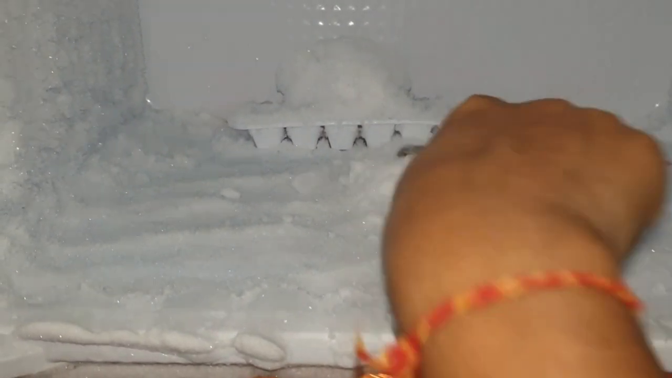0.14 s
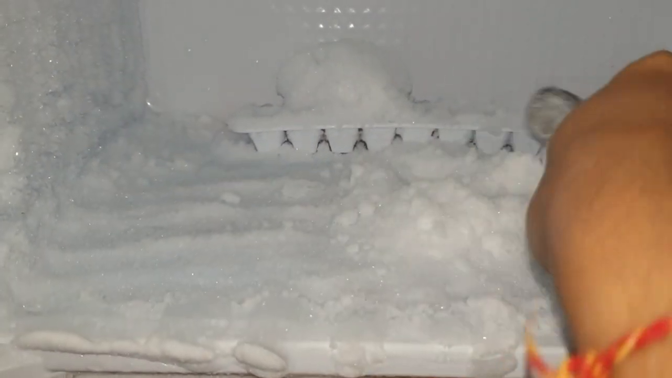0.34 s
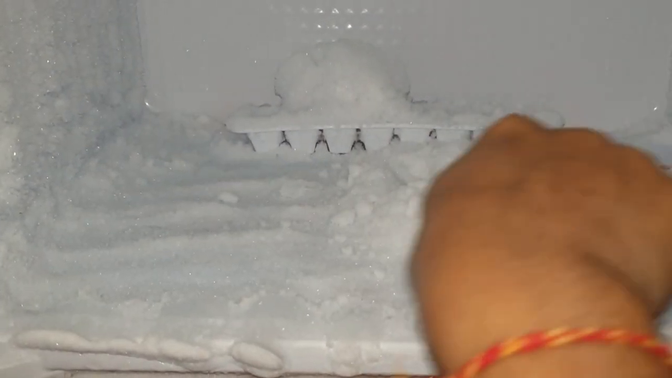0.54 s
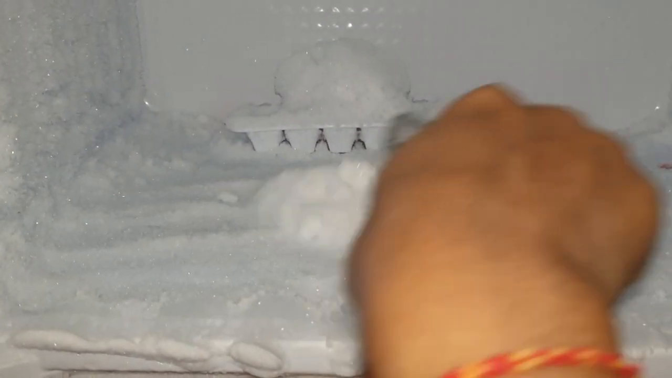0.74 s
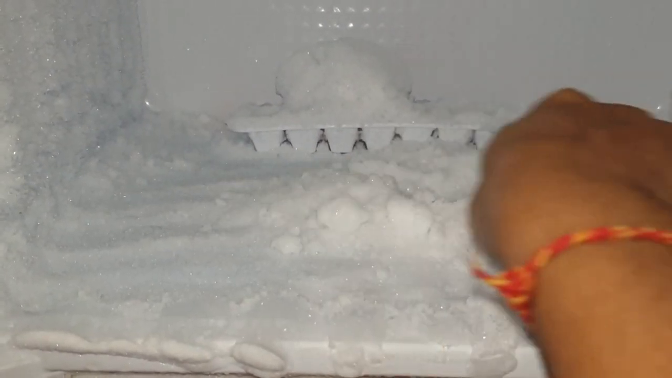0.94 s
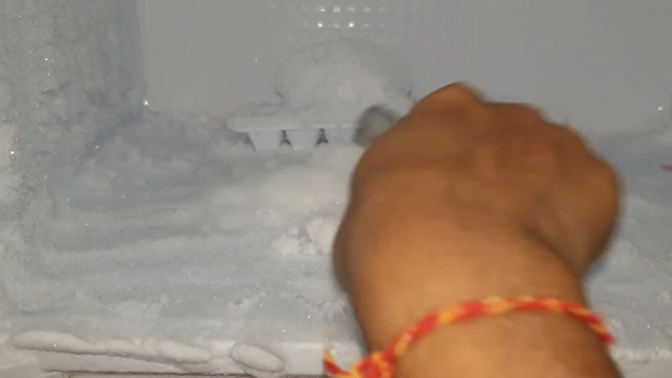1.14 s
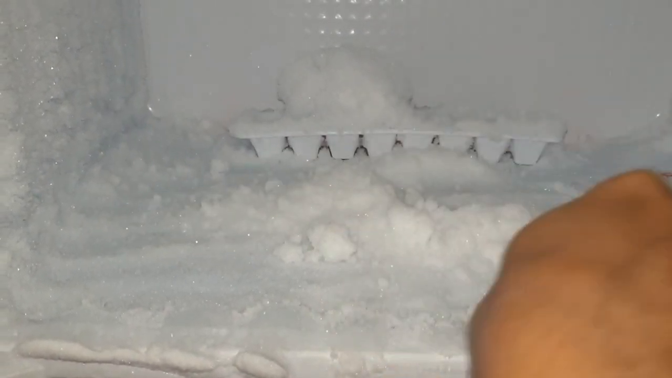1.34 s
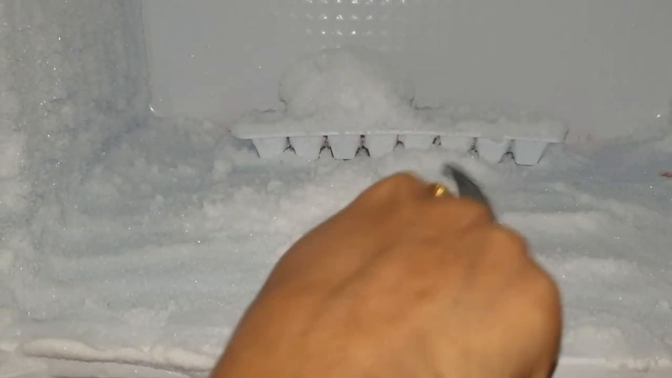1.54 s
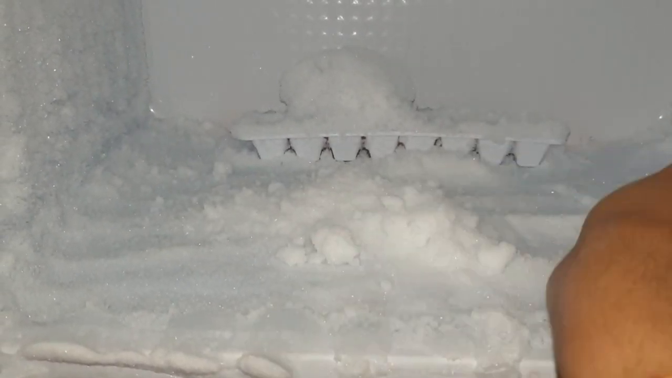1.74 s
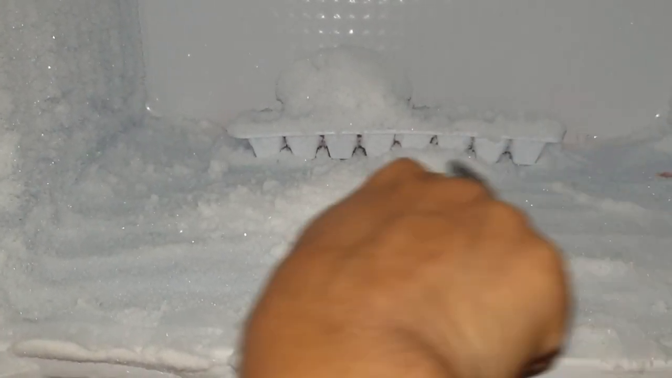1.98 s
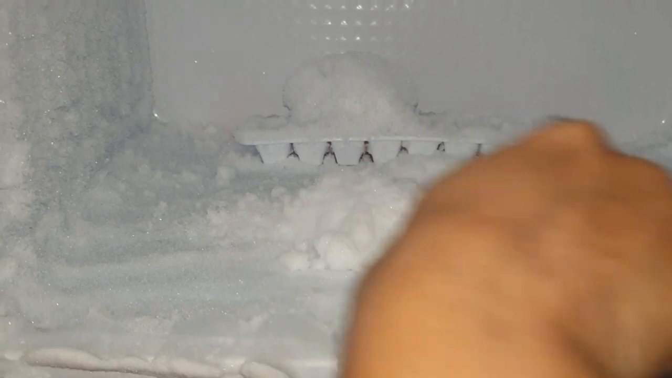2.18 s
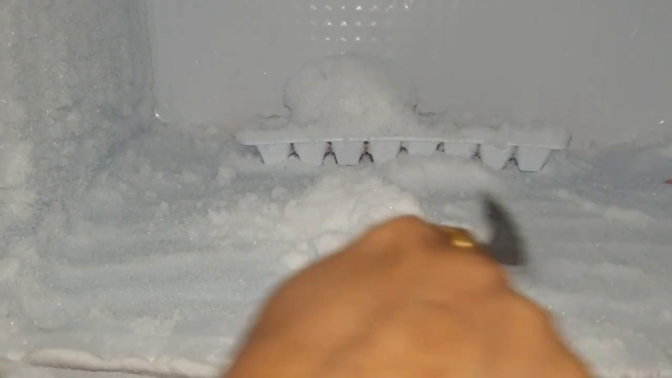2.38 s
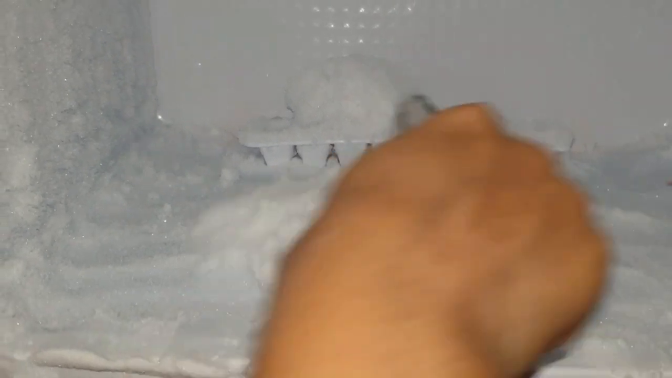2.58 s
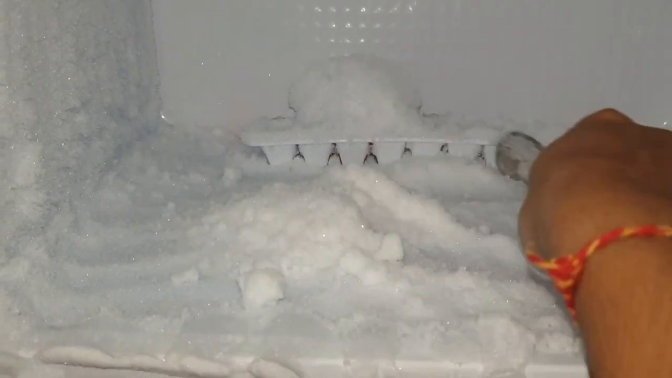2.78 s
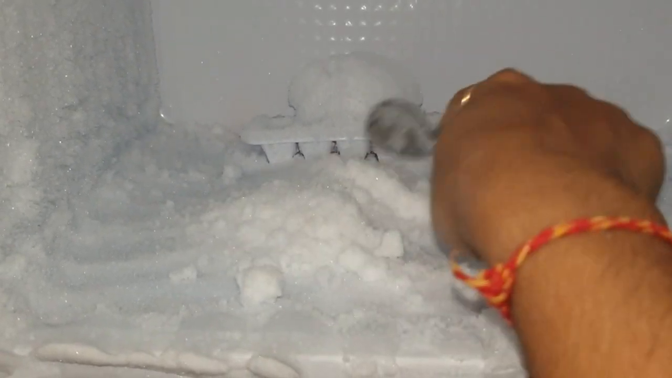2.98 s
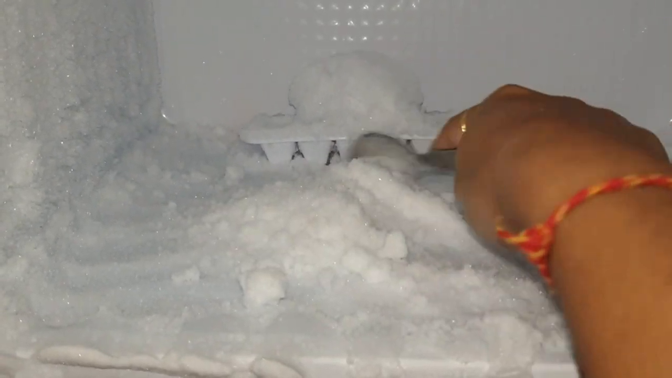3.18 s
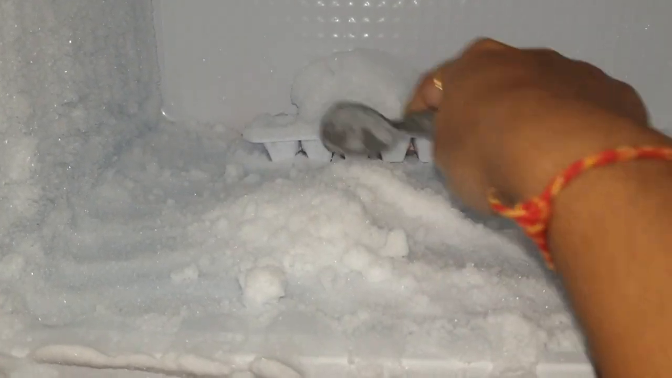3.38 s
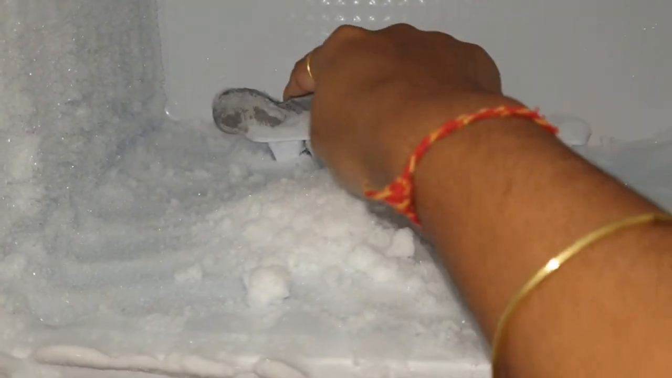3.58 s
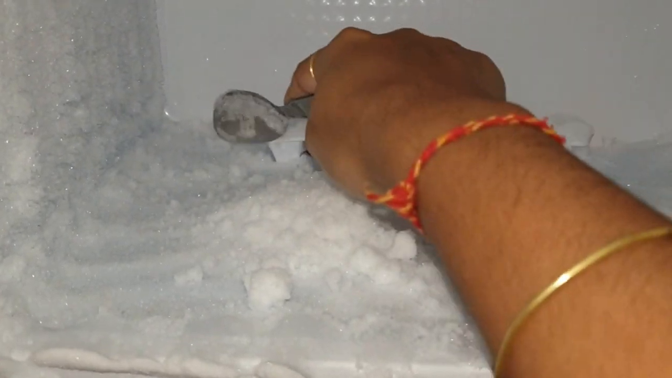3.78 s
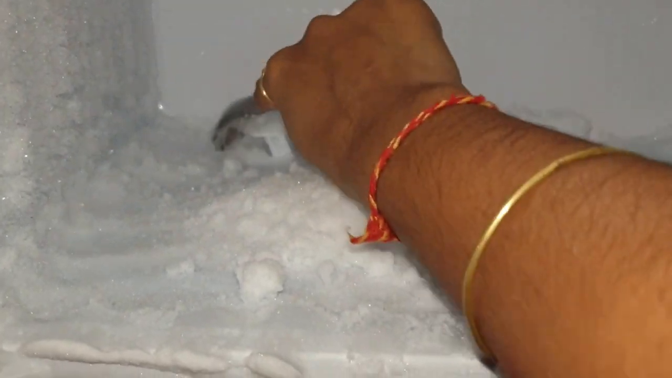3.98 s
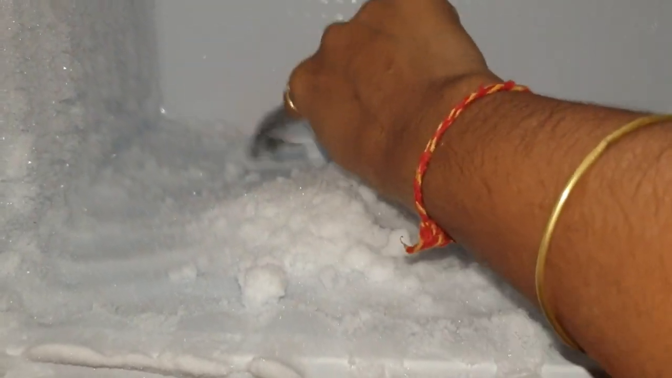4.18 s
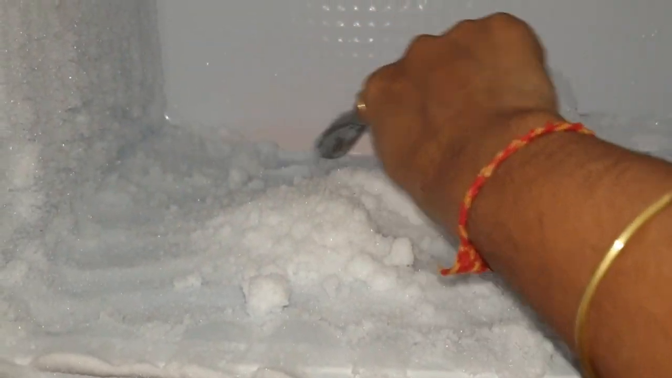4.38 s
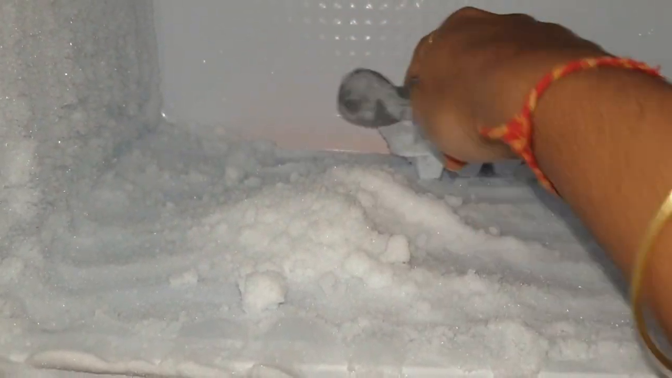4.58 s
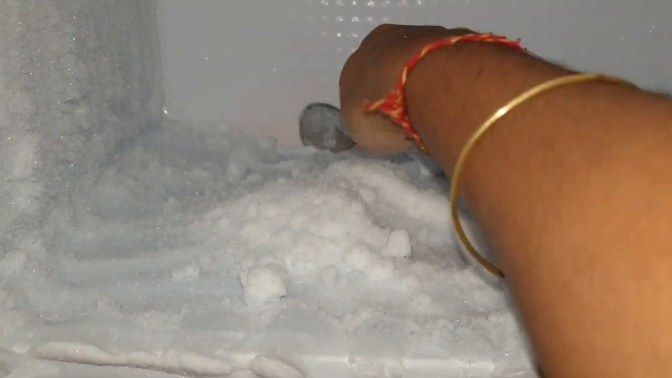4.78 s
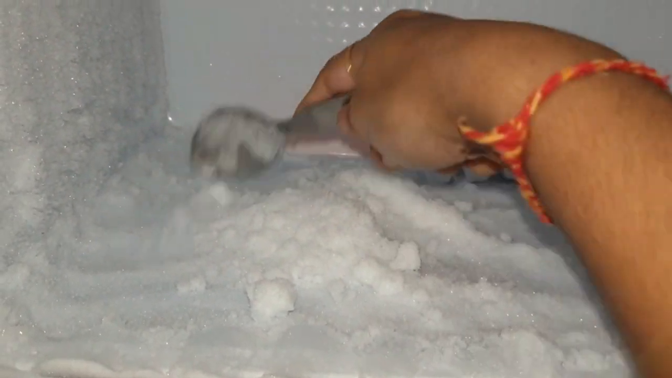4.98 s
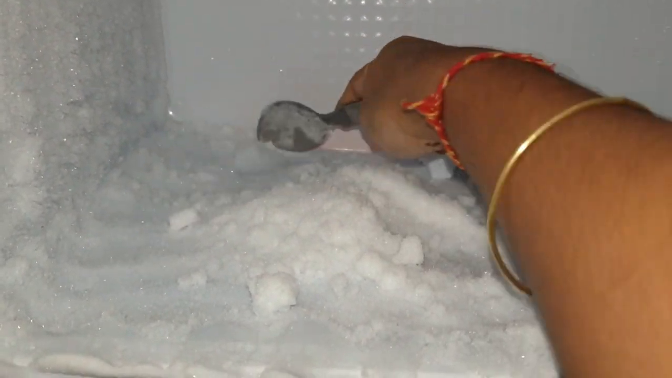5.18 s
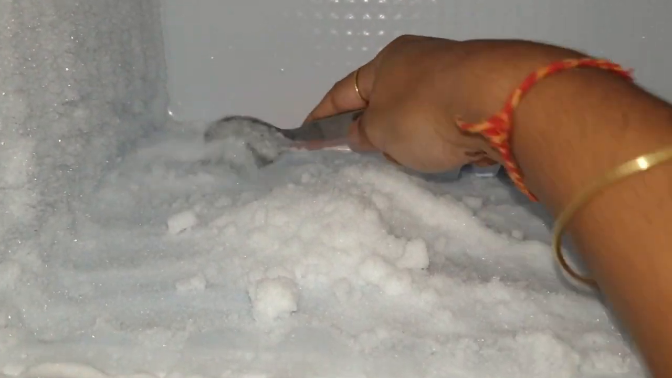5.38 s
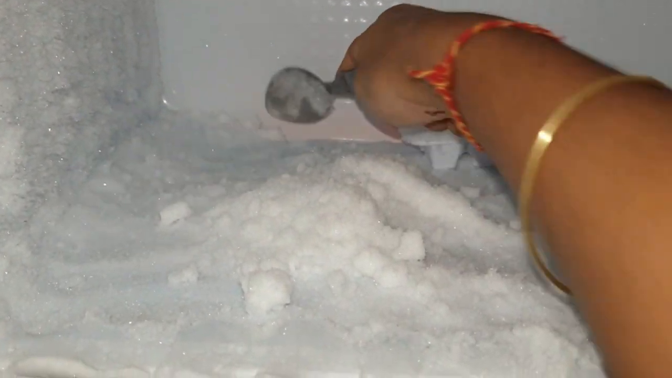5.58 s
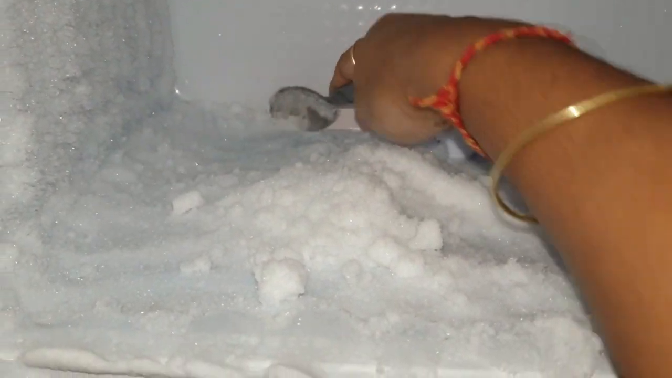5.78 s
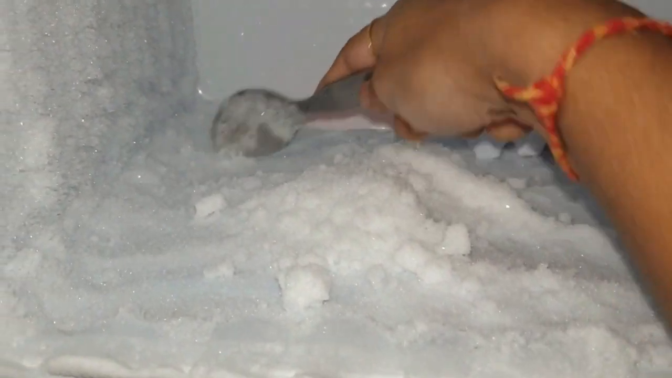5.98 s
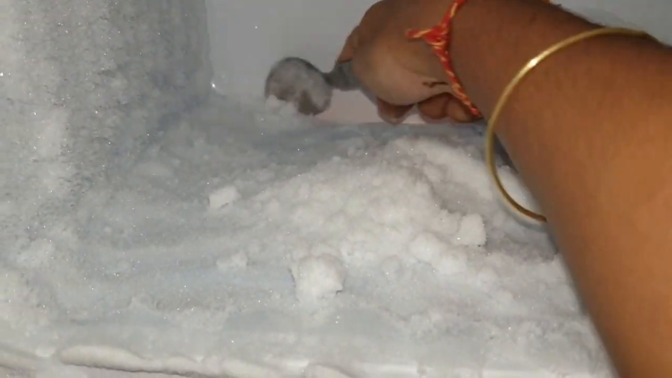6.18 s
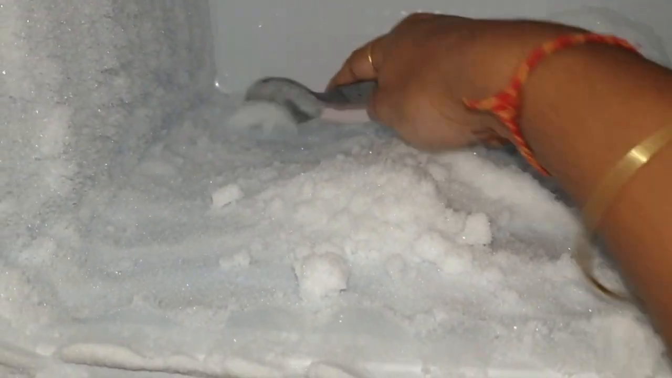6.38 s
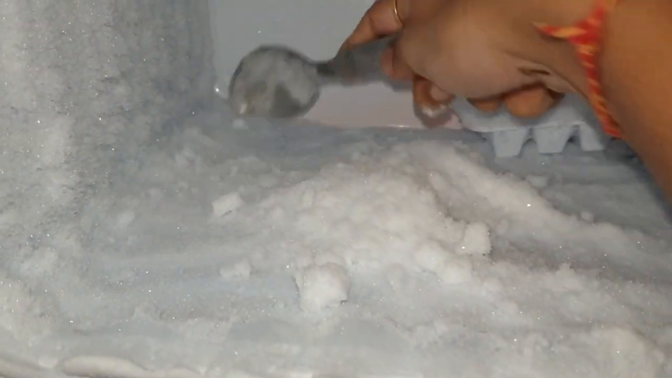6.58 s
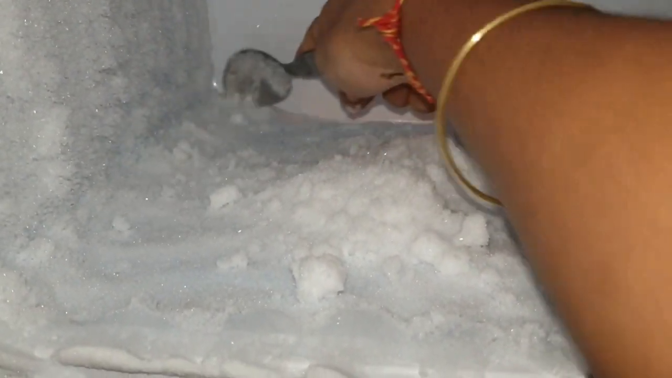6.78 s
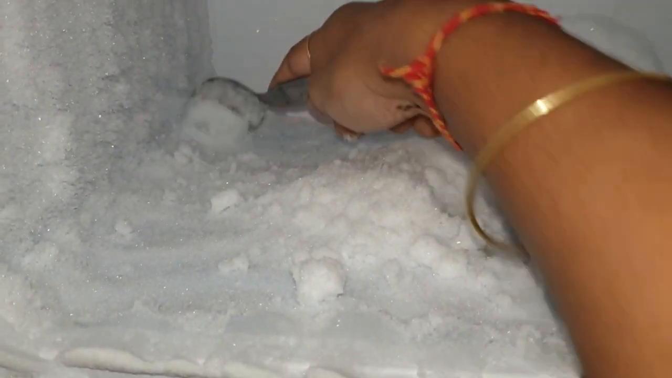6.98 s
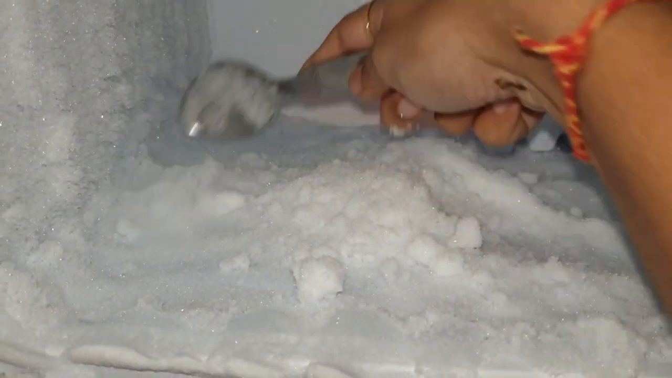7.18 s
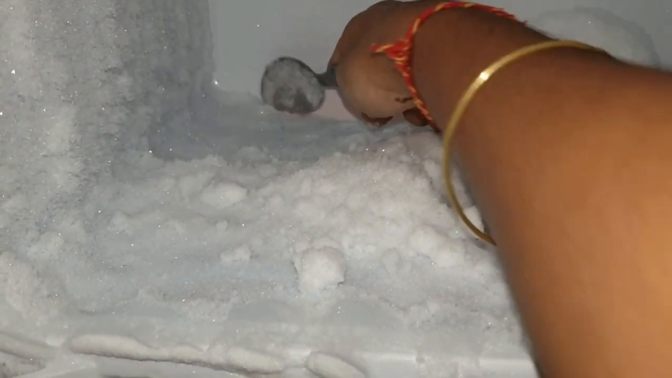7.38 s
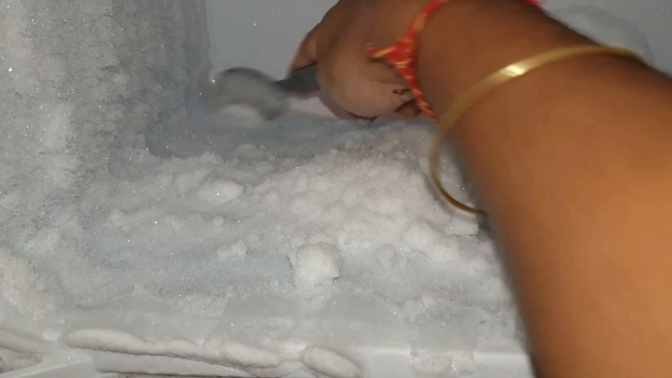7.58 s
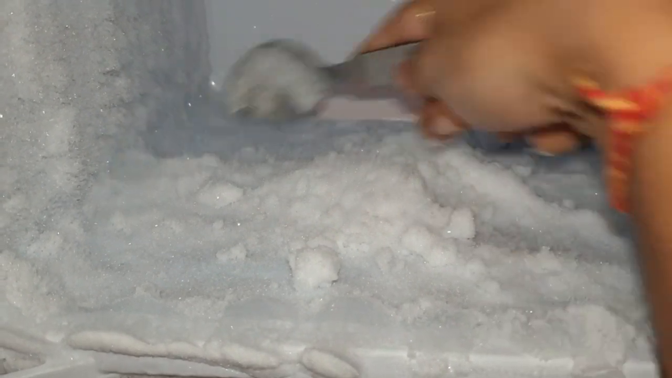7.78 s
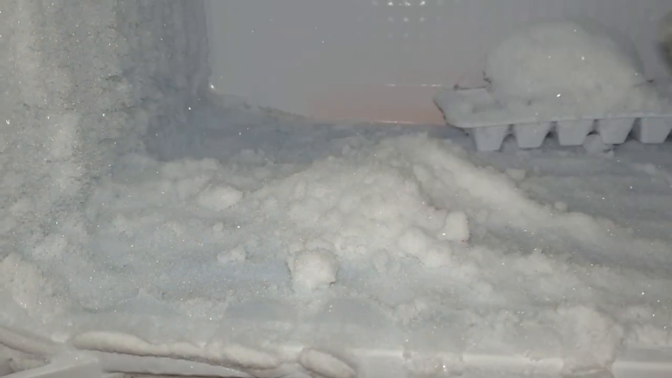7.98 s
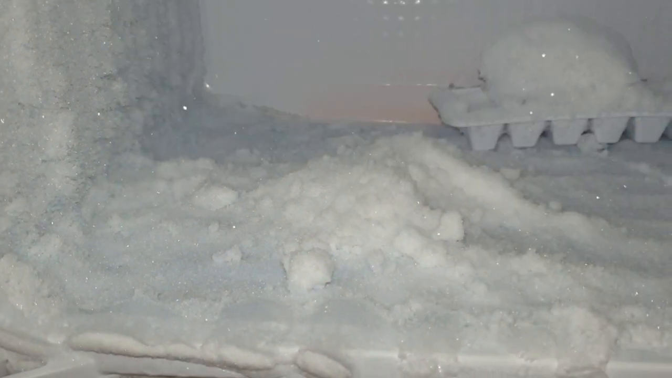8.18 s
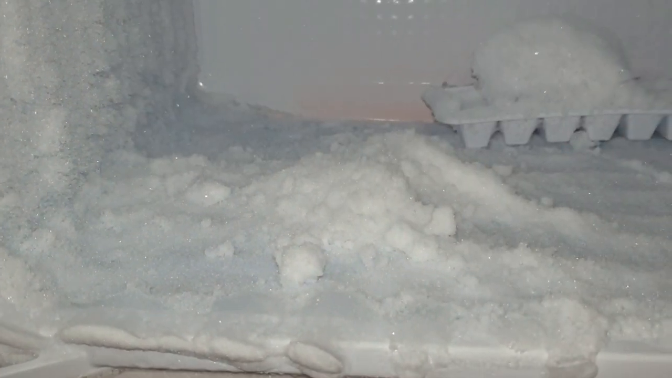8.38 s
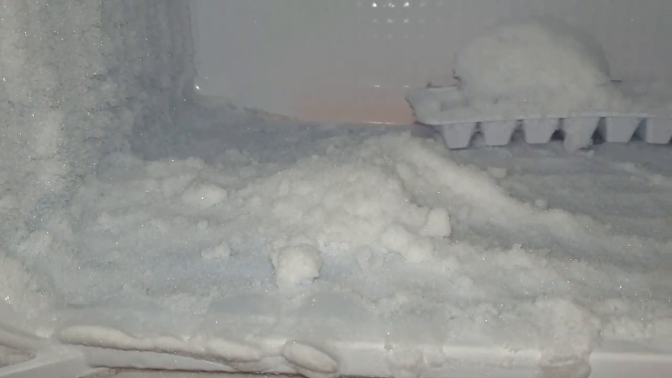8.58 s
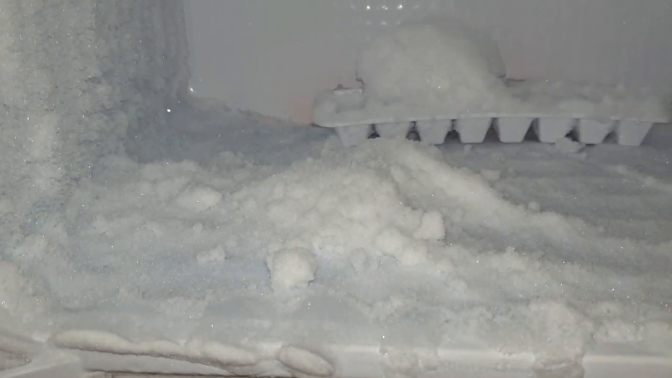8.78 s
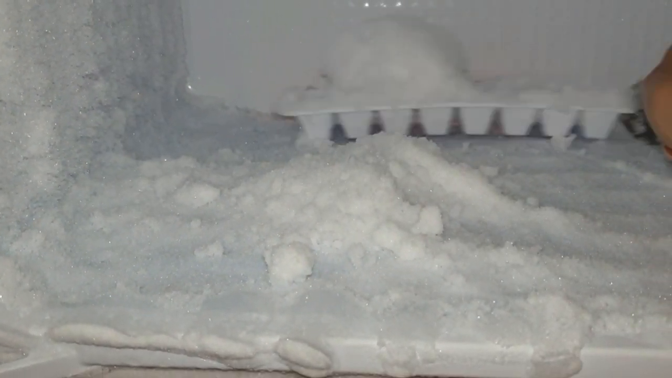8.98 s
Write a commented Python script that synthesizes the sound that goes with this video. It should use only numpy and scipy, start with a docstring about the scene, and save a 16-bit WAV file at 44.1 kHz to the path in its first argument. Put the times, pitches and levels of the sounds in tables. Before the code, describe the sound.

Close up at an open freezer, a steel spoon scrapes thick frost in short, rough strokes about twice a second. Each crunches and judders, with hollow knocks from the box and a gritty metallic edge. Scraping stops near 7.8 seconds; after a pause, an ice tray rasps across the frost and bumps loudly. A low compressor hum and soft air run beneath, with a faint room tail.

```python
"""Crunching, juddering strokes on thick frost, then the rasp of an ice tray slid across, over a low hum and air.
A steel spoon scrapes the floor of a small freezer: its edge sticks and slips, and each slip shakes the floor
panel and the hollow compartment and crushes crystals, which ring the spoon. Falling crumbs, a faint rustle and a
hand pushing the tray near 4 s are made the same way; knocks of spoon and tray are single blows on the box.
A phone at the open door hears it at two ports, with a diffuse room tail; the compressor is wavering sines and noise."""
import sys
import numpy as np
from scipy import signal
from scipy.fft import rfft, irfft, next_fast_len
from scipy.io import wavfile

SR = 44100
rng = np.random.default_rng(int(sys.argv[2]) if len(sys.argv) > 2 else 0)


def to_wav(s):
    """Save 16-bit WAV."""
    ch = np.atleast_2d(s).T  # columns
    pcm = np.round(np.clip(ch, -1, 1) * 32767)  # PCM
    wavfile.write(sys.argv[1], SR, pcm.astype(np.int16))


N = 398663

# Pushes, mostly of the spoon; also falling crumbs (2.52 s), a faint rustle (3.464 s) and a hand pushing
# the tray near 4 s. A stroke is one push, or a few where the edge stalls and starts again.
# Each row: start in seconds, length in seconds, crunch of frost in dB, swell from start to end in dB,
# then judder, boom and sizzle in dB relative to the crunch, before fixed trims.
FROST_PUSHES = [ (0.0, .085, -31, 4, 4.5, 2.5, 1), (0.09, 0.076, -40.5, 5, 4, 16.5, -2),
                (0.142, 0.044, -29, 7, 3, -1, 1), (0.195, 0.088, -34.5, -7.5, 2.5, 4, -1),
                (0.275, 0.073, -53, -7, 4, 8, 1), (0.481, 0.24, -30.5, 4.5, 3.5, 3.5, 1.5),
                (0.951, 0.062, -32, 11.5, 6.5, 8.5, -3.5), (1.024, .12, -25.5, 3, 4.5, 7.5, -3),
                (1.378, 0.069, -32.5, 16.5, 12, 12, 0), (1.446, 0.16, -29.5, -5, 4.5, 6.5, 5),
                (1.801, 0.046, -36, 8, 11.5, 9, -4), (1.838, 0.21, -25, 3, 4.5, 5.5, 1.5),
                (2.316, 0.081, -30, 12.5, 8, 12, 1), (2.391, .11, -23, -1.5, 3, 9.5, -2),
                (2.52, 0.18, -55, -10, 7, 16, 3.5), (2.779, 0.13, -39.5, -7, 12, 18.5, -3),
                (2.878, 0.087, -24, 3, 8.5, 9.5, -3), (3.114, 0.049, -31, 12.5, 12, 13.5, -1),
                (3.183, 0.071, -26, 1, 9, 4, -1.5), (3.261, 0.063, -30.5, -11, 14.5, 12, -18),
                (3.464, 0.086, -54.5, -7, -3, -11, 2), (3.58, 0.031, -41.5, 20, -7, -5, -1),
                (3.602, 0.11, -32.5, 1, 7.5, 4.5, -6.5), (3.762, 0.027, -42.5, 0, 12.5, 15.5, -8),
                (3.974, 0.08, -38.5, -14.5, 10, 12, -6), (4.05, 0.052, -38.5, 14, 8, 7, -5.5),
                (4.115, 0.052, -51, 0, -2, 16, -1), (4.158, 0.11, -29, 11, 10, 8, -5),
                (4.262, 0.13, -28.5, -1.5, 1, 3.5, -6), (4.413, 0.12, -46, -18.5, 6, 13.5, -7),
                (4.781, 0.056, -41, -2, 9, 15.5, -10), (4.836, 0.043, -31.5, 14, 10.5, 11.5, -2),
                (4.884, 0.093, -22.5, -2, 12, 10.5, -5.5), (5.166, 0.18, -34.5, 0, 8, 10, -8),
                (5.322, 0.12, -26.5, -16, 8.5, 3.5, -1.5), (5.419, 0.034, -26, -3, 9.5, 3, -2.5),
                (5.676, 0.032, -36.5, 4, 9, 7.5, -8), (5.728, 0.019, -34, 9, 9.5, 4, 1.5),
                (5.769, 0.15, -33, 1, 7.5, 2.5, 0), (5.88, 0.12, -24, -9, 11, 6, -4.5),
                (6.202, 0.24, -29.5, 3, -0.5, 3, -2), (6.387, 0.039, -21.5, 4.5, 13, 7.5, -0.5),
                (6.461, 0.094, -19.5, -15.5, 8.5, -1.5, -5.5), (6.797, 0.17, -32.5, 9.5, 0, -7, -0.5),
                (6.945, .21, -26, 0.5, 9, 1.5, -0.5), (7.397, 0.049, -37, 16, 2, -6, 1),
                (7.466, .1, -30, 9, -4.5, -1.5, -0.5), (7.589, 0.048, -19.5, 19.5, 8.5, -1.5, -9),
                (7.655, 0.094, -29, -1.5, 8.5, 3, -1), ]
# Shoves of the ice tray over the frost. Each row: the same columns as FROST_PUSHES.
TRAY_SHOVES = [(8.33, 0.25, -61.5, 1, 14.7, 9.6, 9), (8.51, 0.13, -41, 18.5, 6.2, 9.5, -3),
               (8.61, 0.17, -30, 9, 6.2, 8.3, -3.5), (8.8, 0.051, -40.5, 3, 16.2, 24.5, 2),
               (8.941, 0.05, -38.5, 2, 9.3, 7.6, 3), (8.989, 0.032, -28, -2.5, 2.8, 8.8, 1)]
# The spoon's edge lands or breaks through a crust; after 8.7 s the ice tray bumps.
# Each row: start in seconds, blow level in dB,
# then boom, crunch and sizzle in dB relative to the judder, all before fixed trims.
BOX_KNOCKS = [(0.342, -36, -5, -4, -1), (0.486, -16, 6, -5, -18), (0.951, -8.5, 2, -11, -20),
              (1.05, -6.5, 5.5, -2, -27.5), (1.379, -4, -4, -12, -24), (1.795, -3, -8.5, -8, -25),
              (2.463, 0, -12, -3.5, -29), (2.78, -9.5, 3.5, -6, -10), (2.92, -7.5, -8, 1, -3),
              (3.164, 0.5, -5, -9.5, -22), (3.267, -0.5, 2, -15, -37), (3.24, -2, -10, -5, -15),
              (3.612, -12.5, -12, 1.5, -14), (3.781, -23, -8, -12, -20), (3.991, -9.5, -15, -9, -35),
              (4.165, -11, -15, -7, -20), (4.256, -6, -6, -7, -24), (4.316, -17, -13, 3, -4),
              (4.498, -21, -5, -1.5, -7.5), (4.789, -23.5, -3, 1, -12), (4.886, 1, -8, -3.5, -30),
              (5.213, -5.5, -3, -19, -38), (5.322, -1.5, -18, -29.5, -14), (5.434, -3, -5, -1.5, -25),
              (5.892, -0.5, -23, -7.5, -14), (6.174, -1.5, -27, -4, -28), (6.207, -8, -16.5, 3.5, -8),
              (6.398, -6, -10, -4, -8), (6.47, 1, -33, -5.5, -15.5), (6.54, -5, -16, -2.5, -7),
              (7.613, -3, -27.5, 5, -22.5), (8.724, 2.5, -4, -30, -40), (8.813, -26.5, -18, 7, 1.5)]
# Hard ice favours the higher standing waves, soft frost the lower.
# Each row: time in seconds, tilt in dB per octave.
ICE_HARDNESS = [(0.1, -0.8), (0.6, 1), (1.1, -2.5), (1.5, 0), (1.9, 0.8), (2.4, 1.9), (2.9, 1.5), (3.2, -2),
                (3.7, 6), (4.2, -0.7), (4.9, -0.5), (5.4, 1), (5.9, 2), (6.2, 0), (6.5, 0.5), (7.1, -13),
                (7.7, -0.5), (8.72, -5.5), (9.0, 4)]
# Standing waves of the hollow compartment. Each row: nominal frequency in Hz, width in Hz,
# relative level in dB, pressure at the left port as a signed share of the right.
COMPARTMENT_MODES = [(234.8, 24.5, -0.5, 0.37), (274.3, 24.3, 0, 0.57), (320, 26, 2, 0.75),
                     (365.6, 42, -7.5, 1.63), (440.3, 41, -5, 1.84), (481.5, 18.6, 0, 0.78),
                     (563, 16, -4.5, 0.54), (616, 93, -3.5, -0.33), (765.3, 34, 2.5, -0.0027),
                     (813.4, 36.5, -2.5, -0.035), (833, 51, -16.5, -0.32), (1072, 43, -9, 0.15),
                     (1280, 210, -17, -1.01)]
# Standing waves of the floor panel. Each row: the same columns as COMPARTMENT_MODES.
PANEL_MODES = [(108.2, 13.4, -2, 0.57), (126, 31, -18, 0.19), (157.4, 21.7, -7.5, 0.55),
               (220, 42, -19.5, 0.88)]
# Bright bands of the scraping edge. Each row: nominal frequency in Hz, width in Hz, relative level in dB.
SPOON_MODES = [(3340, 120, 0.5), (6020, 180, 2.5), (9950, 230, -6.5), (11000, 357, 8), (11440, 320, 3.5),
               (12880, 500, -2.5), (15700, 710, -12.5)]
# Spectrum of crunching frost. Each row: frequency in Hz, relative level in dB.
CRUNCH_SPECTRUM = [(400, -26.5), (900, 5), (1400, 3.5), (2000, 4.5), (3000, 2), (4200, -4), (5300, -7.5),
                   (6800, -9.5), (8300, -18), (11000, -21.5), (16000, -40)]
# Spectrum of fine powder at the edge. Each row: frequency in Hz, relative level in dB.
POWDER_SPECTRUM = [(3000, -9.5), (7500, -4), (10000, -2.5), (13000, 0.5), (16000, 2)]
# Spectrum of the room tail. Each row: frequency in Hz, level in dB.
ROOM_SPECTRUM = [(60, -7), (150, -10), (350, -4.5), (800, -20), (2000, -18), (5000, -19), (11000, -26.5),
                 (16000, -25.5)]
# Reverberation time of the room. Each row: band centre in Hz, time to fall 60 dB in seconds.
ROOM_DECAY = [(80, 0.5), (250, 0.68), (600, 0.62), (1500, 0.6), (4000, 0.31), (12000, 0.58)]
# Compressor hum and whine. Each row: frequency in Hz, level in dB before waver and port gains.
HUM_TONES = [(49, -66), (70, -42), (107, -51), (1104, -74), (3250, -82.5)]
# Spectrum of the rush of air. Each row: frequency in Hz, relative level in dB.
AIR_SPECTRUM = [(25, -35.5), (50, -20), (80, -12), (110, -21), (250, -36.5), (640, -46.5), (1100, -62),
                (3300, -69), (3900, -73), (8000, -78.5), (11000, -68), (15000, -75)]

ATTACK_S = 0.0085  # the edge sinks in
ARCH_DB = 4  # the hand presses hardest in the middle of a push
# as the edge lifts, the crunch stops sooner than the shaking
FROST_RELEASE_DB_PER_S, BOX_RELEASE_DB_PER_S = 648, 340.5
PORT_LAG_SAMPLES = 20  # direct sound, left port behind right
AIR_DB = -49  # air above 120 Hz, before the last tint and port gains
TOP_HZ = 15650


def scrape(push, steel):
    """One push: slips shake the box, and crystals break in a flurry after each slip."""
    start_s, length_s, crunch_db, swell_db, judder_db, boom_db, sizzle_db = push
    t = seconds(length_s + .09)
    size = len(t)
    jumps = slips(size, rate_hz=400, uneven=.65, spread_db=1.5)

    flurry_s, steady = .004, .25  # steady: grinding that goes on between slips
    after_slips = signal.lfilter([1], [1, -np.exp(-1 / (flurry_s * SR))], jumps)
    flurry = unit(steady + unit(np.sqrt(after_slips)))

    # now and then a larger flake snaps off
    flakes = (rng.random(size) < 45 / SR) * rng.uniform(.3, 1.1, size)
    flake_s = 0.0037
    ticks = signal.lfilter([1], [1, -np.exp(-1 / (flake_s * SR))], flakes)
    # harder and softer patches pass under the edge
    patches = undb(.8 * walk(100.5, size))
    crust = unit(patches * (1 + ticks))

    coarse = flurry * crystals(size, rate_hz=18000, spread_db=2.0)
    fine = flurry * crystals(size, rate_hz=16000, spread_db=2.5) * undb(0.55 * walk(175, size))
    drive = undb(crunch_db) * crust
    on_box = drive * pressure(t, length_s, swell_db, BOX_RELEASE_DB_PER_S) * jumps
    on_frost = drive * pressure(t, length_s, swell_db, FROST_RELEASE_DB_PER_S)
    judder = undb(judder_db - 1) * on_box
    boom = undb(boom_db + 3) * on_box
    crunch = on_frost * coarse
    sizzle = undb(sizzle_db) * on_frost * fine
    return sound([judder, boom, crunch, sizzle], start_s, steel)


def slips(size, rate_hz, uneven, spread_db):
    """Stick-slip: the edge holds for an uneven time, then jumps; a longer hold gives a harder jump."""
    chance = rng.standard_normal((2048, 2))
    holds = np.exp(uneven * np.minimum(chance[:, 0], 2))
    at = (np.cumsum(holds) / holds.mean() * SR / rate_hz).astype(int)
    jumps = np.sqrt(holds) * undb(spread_db * chance[:, 1])
    inside = at < size
    return unit(np.bincount(at[inside], jumps[inside], size))


def crystals(size, rate_hz, spread_db):
    """Tiny fractures at chance instants with chance signs; spread_db makes their strengths uneven."""
    breaks = rng.random(size) < rate_hz / SR
    signs = rng.choice([-1, 1], size)
    strengths = undb(spread_db * np.minimum(rng.exponential(size=size), 5))
    return unit(breaks * signs * strengths)


def pressure(t, length_s, swell_db, release_db_per_s):
    """Force of one push: the edge sinks in, the hand leans on or eases off through an arch, then lets go."""
    along = np.minimum(t / length_s, 1)
    held_db = swell_db * (along - .5) - ARCH_DB * (2 * along - 1) ** 2
    release_db = release_db_per_s * np.maximum(t - length_s, 0)
    return np.minimum(t / ATTACK_S, 1) * undb(held_db - release_db)


def knock(start_s, boom_db, crunch_db, sizzle_db):
    """One blow on the box, with a short burst of crumbling crust."""
    t = seconds(.05)
    blow = 1. * (t == 0)
    # a negative spread: strengths fall from a common ceiling
    crumble = crystals(len(t), rate_hz=5000, spread_db=-1.0)
    crumble = crumble * np.exp(-t / 0.0014) * np.minimum(t / 0.00076, 1)
    crumble /= np.sqrt(np.sum(crumble ** 2))
    judder = blow + .5 * crumble
    boom = undb(boom_db + 2.0) * blow
    crunch = undb(crunch_db - 5) * crumble
    sizzle = undb(sizzle_db + 1.5) * crumble
    return sound([judder, boom, crunch, sizzle], start_s, steel=1.0)


def sound(forces, start_s, steel):
    """Judder rings the compartment, boom the floor panel; crunch and sizzle come from the frost and the edge."""
    judder, boom, crunch, sizzle = forces
    middle_s = start_s + len(judder) / SR / 2
    tilt_db = np.interp(middle_s, *np.transpose(ICE_HARDNESS))
    # fine frost, which sizzles most, also crunches brighter than coarse lumps
    sizzle_share_db = 20 * np.log10(sizzle.std() / crunch.std())
    bright_db = np.clip(0.4 * (sizzle_share_db + 4), -4, 3)
    crunch = tint(crunch, [(1500, -bright_db), (4000, bright_db)])
    # a blunt edge hisses duller than steel
    sizzle = tint(sizzle, [(11000, 0), (16000, bright_db if steel else -9)])

    def compartment_path():
        """Compartment response at one place of contact."""
        return modes(COMPARTMENT_MODES, 0.17, tilt_db, place_db=2.0, detune=0.012, band_hz=[210, 1600])

    def panel_path():
        """Floor panel response at one place of contact."""
        return modes(PANEL_MODES, 0.26, 0, place_db=1.5, detune=0.0111, band_hz=[65, 250])

    return (travel(judder, compartment_path, dwell_s=.1)
            + travel(boom, panel_path, dwell_s=0.33)
            + travel(crunch, frost_path, dwell_s=.02)
            + travel(sizzle, lambda: edge_path(steel), dwell_s=.018))


def travel(force, path, dwell_s):
    """The contact moves on: every dwell_s the force meets a new response."""
    out = np.zeros((2, len(force) + SR // 4))
    step = int(max(dwell_s, .01) * SR)
    for i in range(0, len(force), step):
        add(out, signal.fftconvolve(force[None, i:i + step], path(), axes=1), i / SR)
    return out


def modes(table, length_s, tilt_db, place_db, detune, band_hz):
    """Standing waves as damped cosines at both ports; each place of contact weights and detunes them anew."""
    t, ring = seconds(length_s), 0
    places = rng.standard_normal((len(table), 3))
    for (hz, width_hz, db, left), (weight, shift, side) in zip(table, places):
        decay = width_hz * np.exp(-np.pi * width_hz * t)
        wave = np.sign(side) * decay * np.cos(2 * np.pi * hz * (1 + detune * shift) * t)
        gain = undb(db + tilt_db * np.log2(hz) + place_db * weight)
        ring = ring + np.array([[left], [1]]) * gain * wave
    edges_hz = np.minimum(band_hz, SR / 2 - 1)
    band = signal.butter(3, edges_hz, "band", fs=SR, output="sos")
    return ports(signal.sosfilt(band, ring))


def frost_path():
    """Crunching frost as it reaches the ports, with the close walls' reflections."""
    return ports(tint(icy_walls(echo_db=5.5, t60_s=0.032, left_db=-7), CRUNCH_SPECTRUM))


def edge_path(steel):
    """Fine powder hisses at the edge; steel is the gain of the spoon's damped ring beside it."""
    walls = icy_walls(echo_db=-1.5, t60_s=0.009, left_db=-10.5)
    t, ring = seconds(.01), 0
    place_db, detune = 2, .01
    places = rng.standard_normal((len(SPOON_MODES), 2))
    for (hz, width_hz, db), (weight, shift) in zip(SPOON_MODES, places):
        decay = width_hz * np.exp(-np.pi * width_hz * t)
        wave = decay * np.cos(2 * np.pi * hz * (1 + detune * shift) * t)
        ring = ring + undb(db + place_db * weight) * wave
    spoon = signal.fftconvolve(walls, ring[None], axes=1)[:, :walls.shape[1]]
    powder = tint(icy_walls(echo_db=34, t60_s=0.0098, left_db=-7.5), POWDER_SPECTRUM)
    return ports(steel * ports(spoon) + undb(-8) * ports(powder))


def icy_walls(echo_db, t60_s, left_db):
    """A direct click, later and weaker at the left port, plus a rush of reflections off the close walls."""
    t = seconds(.04)
    echoes = rng.standard_normal((2, len(t))) * np.exp(-np.log(1000) * t / t60_s)
    echoes = echoes / np.sqrt(np.sum(echoes[0] ** 2))
    direct = np.arange(len(t)) == np.array([[PORT_LAG_SAMPLES], [0]])
    return undb([[left_db], [0]]) * (direct + undb(echo_db) * echoes)


def room(x):
    """The room outside the door answers the right port's sound with a dull, diffuse tail."""
    t = seconds(.7)
    noise = rfft(rng.standard_normal((2, len(t))))
    hz, tail = np.arange(noise.shape[1]) / t[-1], 0
    # long waves reach both ports alike
    noise[0] = 0.56 * noise[0] + .5 * noise[1] / (1 + (hz / 400) ** 2)
    for centre_hz, t60_s in ROOM_DECAY:
        share = on_log_axis([(f, f == centre_hz) for f, _ in ROOM_DECAY], hz)
        decay = np.exp(-np.log(1000) * t / t60_s) * np.minimum(t / 0.022, 1)
        tail = tail + irfft(noise * share, len(t)) * decay / np.sqrt(np.sum(decay ** 2))
    return signal.fftconvolve(x[1][None], tint(tail, ROOM_SPECTRUM), axes=1)[:, :N]


def compressor():
    """A low hum with a faint whine, sines wavering in level and phase, over a soft rush of air (noise)."""
    t, hum = np.arange(N) / SR, 0
    waver_db, waver_rad = 2.5, .6
    for hz, db in HUM_TONES:
        level = np.sqrt(2) * undb(db + waver_db * walk(4.5, N))
        hum = hum + level * np.sin(2 * np.pi * hz * t + waver_rad * walk(3.5, N))
    # long waves reach both ports alike
    shared = tint(rng.standard_normal(N), [(300, 3.5), (1500, -4.5)])
    apart = tint(rng.standard_normal((2, N)), [(150, -20.0), (700, 9.5)])
    air = tint(shared + apart, AIR_SPECTRUM)
    high_pass = signal.butter(4, 120, "high", fs=SR, output="sos")
    above_hum = signal.sosfilt(high_pass, air.mean(0))
    rush = tint(air, [(50, 1.0), (75, -20.5), (130, 3.0)]) * undb(AIR_DB) / above_hum.std()
    return undb([[-2.5], [2]]) * (hum + rush)


def undb(db):
    """Decibels to gain."""
    return 10 ** (np.asarray(db) / 20)


def unit(x):
    """Scale to rms 1."""
    return x / np.sqrt(np.mean(x ** 2))


def ports(pair):
    """Scale a response so that the mean of both ports carries unit energy."""
    return pair / np.sqrt(np.sum(pair.mean(0) ** 2))


def seconds(length_s):
    """A time axis of this length."""
    return np.arange(int(length_s * SR)) / SR


def walk(rate_hz, size):
    """Smooth chance with a spread near 1: straight lines between rate_hz random levels a second."""
    at = np.arange(size) * rate_hz / SR
    return np.interp(at, np.arange(4096), rng.standard_normal(4096))


def on_log_axis(points, hz):
    """Read a (Hz, value) table along log frequency."""
    knots_hz, values = np.transpose(points)
    return np.interp(np.log(np.maximum(hz, 1)), np.log(knots_hz), values)


def tint(x, points):
    """Give x a spectrum of (Hz, dB) points, causally, so that attacks stay sharp."""
    size = next_fast_len(x.shape[-1] + 2048, real=True) // 2 * 2
    hz = np.arange(size // 2 + 1) * SR / size
    # folding the cepstrum gives minimum phase
    cepstrum = irfft(np.log(undb(on_log_axis(points, hz))))
    cepstrum[1:size // 2] *= 2
    cepstrum[size // 2 + 1:] = 0
    return irfft(rfft(x, size) * np.exp(rfft(cepstrum)))[..., :x.shape[-1]]


def add(track, x, start_s):
    """Mix x in at a time in seconds."""
    i = max(round(start_s * SR), 0)
    track[:, i:i + x.shape[1]] += x[:, :max(track.shape[1] - i, 0)]


def scene():
    """Pushes over the frost, shoves of the tray and knocks in the box, heard with the room and the compressor."""
    work = np.zeros((2, N))
    for push in FROST_PUSHES:
        add(work, scrape(push, steel=0.53), push[0])
    for shove in TRAY_SHOVES:
        add(work, scrape(shove, steel=0), shove[0])
    for start_s, db, *colour_db in BOX_KNOCKS:
        add(work, undb(db + 14.5) * knock(start_s, *colour_db), start_s)
    return work + room(work) + compressor()


def record(dry):
    """The phone rounds off the loudest peaks and cuts the top."""
    rounded = dry / (1 + dry ** 6) ** (1 / 6)
    low_pass = signal.ellip(14, .2, 70, TOP_HZ, fs=SR, output="sos")
    return signal.sosfilt(low_pass, rounded)


dry = scene()
out = record(dry)
to_wav(out)
```